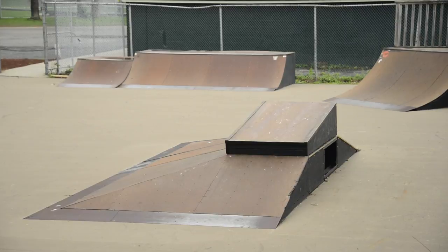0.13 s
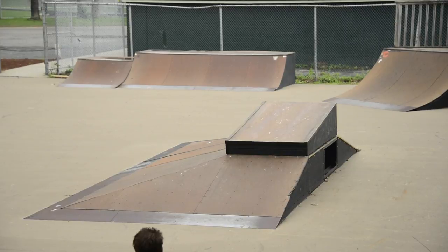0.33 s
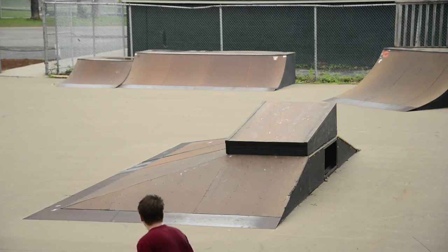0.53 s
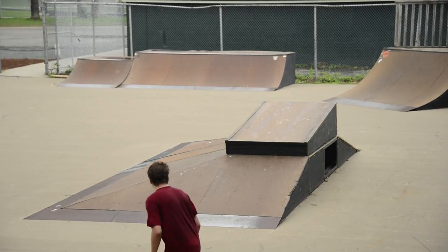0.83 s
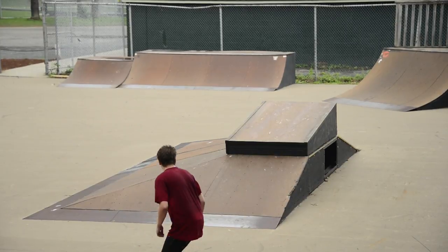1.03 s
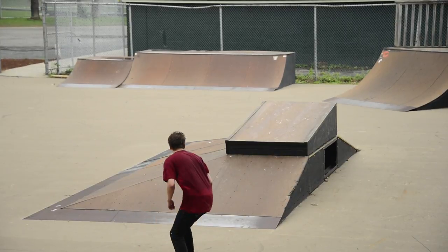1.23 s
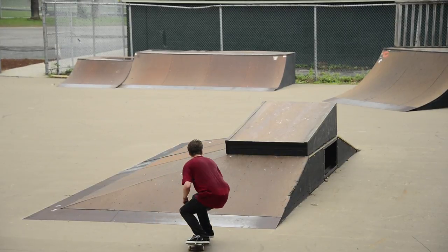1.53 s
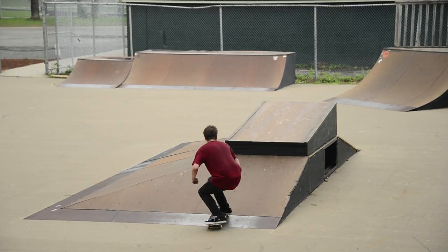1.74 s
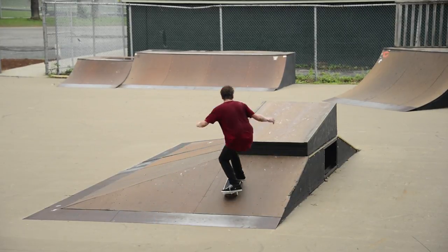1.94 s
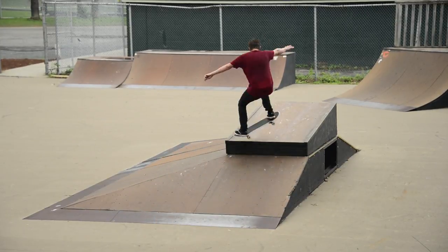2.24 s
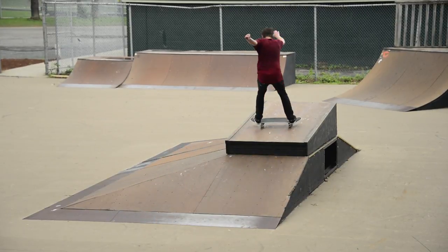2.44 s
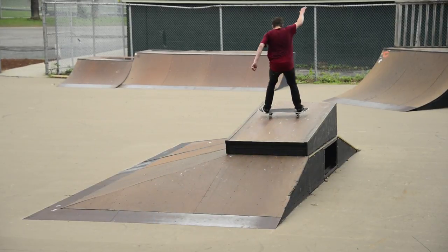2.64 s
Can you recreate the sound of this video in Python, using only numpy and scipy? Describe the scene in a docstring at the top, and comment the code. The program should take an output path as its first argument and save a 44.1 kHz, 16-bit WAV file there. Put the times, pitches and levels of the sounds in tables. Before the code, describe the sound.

A skateboard cuts in abruptly at 0.1 s, coarse and woody with stony knocks and a singing deck tone until 0.45, then duller, receding rolling with faint hiss. Bright hardware rattles tick at 1.0 and 1.2. Hard wood-and-steel clacks hit the hollow ramp at 1.83-1.96, a sharp pop at 2.2, near quiet, then a clipped, booming landing at 2.43, small knocks to 2.6 and fading outdoor echoes.

```python
"""A skateboard rolls away over asphalt, clatters across the steel lip of a wooden ramp, pops and lands on
a hollow box. Random grit excites the deck's resonances, beside a narrow-band drone and bearing hiss.
Noise bursts ring loose hardware, board and steel; impulses ring the ramp and box.
Decaying noise makes the echoes of ramps and fences; the microphone clips the hardest blows."""
import sys
import numpy as np
from scipy import signal
from scipy.fft import rfft, irfft, next_fast_len
from scipy.io import wavfile
from scipy.ndimage import map_coordinates

SR = 44100
rng = np.random.default_rng(int(sys.argv[2]) if len(sys.argv) > 2 else 0)


def master_out(mix):
    """Clip the mix to full scale and print it as 16-bit PCM to the path in sys.argv[1]."""
    frames = np.transpose(np.atleast_2d(mix))
    ceiling = np.clip(frames, -1, 1)
    pcm = np.round(ceiling * 32767).astype(np.int16)
    wavfile.write(sys.argv[1], SR, pcm)


N = 123479

# Ground rumble. Each row: frequency in Hz, relative spectral level in dB.
RUMBLE_SPECTRUM = [(15, -51), (25, -22), (54, -17.5), (226, -15.5), (257, -16), (330, -11), (430, -21),
                   (730, -120)]

# Echo decay of the yard. Each row: frequency in Hz, t60 in seconds.
YARD_DECAY = [(100, 1), (1000, 0.39), (3500, 0.73), (6500, 1), (10000, 0.3), (15000, 0.15)]
BLOW_ECHO_DB, RATTLE_ECHO_DB = -13.5, -28
ECHO_DULL_HZ = 8200  # echoes lose their treble above this

# Rattles of loose hardware. Each row: start in seconds, relative level in dB, rise time constant in seconds,
# t60 in seconds.
RATTLES = [(1.019, -13.5, 0.012, 0.3), (1.019, -9, .0004, 0.013), (1.027, -4.5, 0.00025, 0.0069),
           (1.031, 0.5, .001, 0.024), (1.038, -1.5, 0.00052, 0.015), (1.046, -0.5, 0.00026, 0.015),
           (1.055, -11, .0005, 0.012), (1.075, -7.5, 0.0006, 0.015), (1.084, -15, .004, 0.042),
           (1.165, -16, 0.011, 0.18), (1.168, -13, .0003, 0.0055), (1.178, 1.5, 0.00083, 0.0077),
           (1.191, -3.5, 0.00024, 0.0076), (1.227, -13, 0.0005, 0.016), (1.241, -14, .0006, 0.027),
           (1.849, -11, 0.0009, 0.038), (1.861, -11, .001, 0.022), (1.931, -3, 0.00065, 0.02),
           (1.915, -16, 0.017, 0.64), (1.975, -16, .004, .1), (2.459, -19.5, 0.0027, 0.12)]
# Hardware resonances. Each row: centre in Hz, width in Hz, relative level in dB.
HARDWARE_MODES = [(4500, 1740, -10.5), (5270, 675, 0), (6720, 1240, -9), (7870, 1800, -14.5)]
SNAP_DB = 2.5  # first click of a rattle over its chatter
RATTLE_TOP_HZ = 9100
SHARP_S = 0.0008  # a rise slower than this softens the first contact

# Blows. Each row: start in seconds, relative board level in dB, favoured pitch in Hz, favoured range in octaves,
# relative steel level in dB, relative hollow ramp or box level in dB, rise time constant in seconds,
# t60 in seconds.
BLOWS = [(1.026, -23, 2500, 2.1, -40, -18, 0.003, 0.13), (1.183, -20, 2480, 1.7, -53, -15.5, 0.0026, 0.045),
         (1.828, -6.5, 1200, 2.4, -8, -6, 0.0012, 0.091), (1.842, -23, 1000, 0.66, -12, -9, 0.00062, 0.032),
         (1.886, -5, 1170, 0.99, -18, -8, 0.00067, 0.022), (1.898, -2.5, 2040, 1, -1, -5.5, 0.00038, 0.049),
         (1.908, -29, 1790, 1.4, -12, -45, 0.0006, 0.13), (1.96, -4.5, 1560, 0.67, -40, -14, 0.0003, 0.017),
         (2.122, -13, 1860, 0.34, -28, -24.5, 0.0028, 0.08),
         (2.14, -36, 1720, 0.31, -45, -36, 0.0035, 0.03),
         (2.194, -7.5, 2830, 2.3, 0.5, -19, 0.0017, 0.0092),
         (2.199, -1.5, 2370, 1.2, -8, -28, 0.00097, 0.024),
         (2.213, -18.5, 1050, 0.68, -28, -26, 0.0016, 0.15),
         (2.3, -19.5, 1290, 1.05, -47, -25, 0.0016, 0.042),
         (2.376, -22, 2750, 1.6, -25.5, -25, 0.00035, 0.025),
         (2.4299, 3, 1350, 2.7, -9.5, -1, 0.00024, 0.02), (2.433, -1, 600, 0.76, -11.5, -13, 0.00022, 0.03),
         (2.445, -13, 885, 0.88, -21.5, -22, 0.00071, 0.044), (2.454, -30, 700, 0.84, -40, -12, .002, .03),
         (2.464, -21.5, 700, 1, -32, -10, 0.0018, 0.086), (2.576, -27, 1500, 0.98, -40, -14.5, .002, 0.054),
         (2.586, -17.5, 600, 0.72, -44, -19, 0.0016, 0.058)]
# Resonances of the struck bodies. Each row: centre in Hz, width in Hz, relative level in dB.
BOARD_MODES = [(550, 116, 1.5), (920, 290, 2), (1134, 170, 6.5), (1480, 330, -1.5), (1817, 165, 3),
               (2180, 340, 2), (3180, 1100, 2), (4070, 780, 2)]
STEEL_MODES = [(3870, 690, -2), (4870, 370, 3.5), (5830, 430, -3), (7130, 1800, -13)]
RAMP_MODES = [(95.6, 17, -4.5), (128, 54, 0.5), (159, 55, -3), (288, 63, -3.5), (404, 28, -3.5),
              (533, 47, 1)]
BOX_MODES = [(55, 10, -7), (90, 22, -5), (141, 17, -3.5), (210, 66, -7.5), (296, 20, -6), (448, 89, -5.5)]
STRIKE_DB = 14.5  # first contact over the clatter that follows
ON_BOX_S = 2.25  # later blows land on the box
# Needle-sharp cracks at hard contact. Each row: start in seconds, relative level in dB.
CRACKS = [(1.8289, -21), (1.833, -26), (1.898, -17), (2.2005, -13), (2.4301, -5)]
CRACK_T60_S, CRACK_LOW_HZ = 0.0025, 5850

# Rolling. Each row: time in seconds, relative level of the deck's excitation in dB, then the levels of the
# low drone, the bearing hiss and the ground rumble in dB.
ROLL_LEVELS = [(.1, -13.5, -28, -31.5, -30), (.2, -10.5, -29.5, -34, -35.5), (.4, -11.5, -26.5, -34, -40.5),
               (.5, -22, -28, -35.5, -36), (.7, -22, -26.5, -34.5, -40), (.82, -19.5, -24.5, -34.5, -38),
               (.95, -21, -36.5, -35.5, -37), (1.0, -20, -27, -36, -39.5), (1.2, -18.5, -29.5, -34, -34.5),
               (1.38, -17, -33.5, -33.5, -41), (1.43, -20, -31, -35.5, -40), (1.5, -20, -26.5, -36.5, -45),
               (1.6, -19.5, -36, -36.5, -37.5), (1.8, -21, -32.5, -38, -43), (1.93, -26.5, -27.5, -28, -42),
               (2.0, -28, -42, -36.5, -29), (2.15, -29.5, -41, -37.5, -36), (2.3, -34.5, -61, -40, -44),
               (2.41, -42, -50, -44.5, -54), (2.5, -30.5, -31, -34, -36), (2.62, -34, -61, -43.5, -38.5),
               (2.8, -39, -42, -44.5, -51.5)]
# Larger stones under a wheel. Each row: time in seconds, relative peak in dB.
STONES = [(0.1, 0), (0.169, 5), (0.206, -4), (0.24, -10), (0.251, -3), (0.374, -1.5), (0.404, 2),
          (0.424, -6)]
STONE_GAIN_DB = 14.5
GRAINS_PER_S, GRAIN_SPREAD_DB = 700, 3
SMOOTH_SHARE = 0.95  # share of the grit's power that is a smooth rub
# Pitch of the drone. Each row: time in seconds, frequency in Hz.
DRONE_PITCH = [(.1, 495), (.44, 500), (.48, 410), (.8, 385), (1.2, 385), (1.45, 348), (1.9, 350),
               (2.8, 270)]
DRONE_CORNER_HZ = 95  # corner of each pole limiting the drone's spread to either side
# Bearing hiss. Each row: frequency in Hz, relative spectral level in dB.
HISS_SPECTRUM = [(1350, -62), (2300, -6), (3020, -0.5), (3630, -1), (4160, 6), (5430, 3), (6960, -3),
                 (8780, -13), (15600, -35.5)]
# One deck mode sings out. Each row: time in seconds, level in dB.
SING_LEVEL = [(.08, -40), (.124, -20), (.146, -36), (.17, -24), (.214, -16), (.26, -38), (.33, -25),
              (.385, -16), (.42, -27.5), (.46, -26), (.6, -37), (1.0, -33.5), (1.8, -43.5), (1.84, -56)]
# The singing mode. Each row: centre in Hz, width in Hz, relative level in dB.
SING_MODE = [(1625, 110, 0)]
# Deck resonances as the board draws away, then on wood. Each row: centre in Hz, width in Hz, relative level in dB.
NEAR_MODES = [(647, 360, -11), (892, 86, -0.5), (1065, 225, -5), (1320, 194, -2), (1434, 150, -1),
              (1783, 116, -0.5), (2114, 68, -4.5), (2540, 170, -13.5)]
MIDWAY_MODES = [(623, 190, -1), (820, 48, 2.5), (1063, 220, 3.5), (1340, 87, 4.5), (1430, 110, 6),
                (1698, 100, 9), (1874, 140, 4), (2370, 1300, -9)]
FARTHER_MODES = [(625, 45, 2), (906, 57, 2), (1003, 97, 0), (1267, 64, 5.5), (1616, 143, 5),
                 (1980, 400, -1)]
FAR_MODES = [(609, 41, 4.2), (850, 61, 3.8), (1380, 280, 3.4), (1565, 190, 4.5), (1696, 155, 5.2)]
ON_WOOD_MODES = [(555, 310, 1.5), (1190, 540, 2), (1581, 380, 4.5), (2270, 2400, -1.5), (3230, 9000, -11)]
# Which set is heard. Each row: time in seconds, set number from 0 (near) to 4 (on wood).
STAGE = [(.42, 0), (.55, 1), (.92, 1), (1.05, 2), (1.38, 2), (1.42, 3), (1.82, 3), (1.85, 4)]
# The soft wheels pass little above this. Each entry: low-pass corner in Hz for one set, in the same order.
SOFT_WHEEL_HZ = [2570, 2650, 2600, 2120, 5650]
WAVER_DB, WAVER_PER_S = 0.88, 30  # each deck resonance swells on its own

START_S, FADE_IN_S = .08, 0.0017  # the sound cuts in
CLIP, KNEE = 1.0, 5.3  # saturation ceiling and sharpness of its bend
MIC_HISS_DB = -62
BASS_CUT_HZ, TOP_HZ = 31, 15800


def amp(db):
    """The decibel law: level in dB to amplitude gain."""
    return 10 ** (np.asarray(db) / 20)


def unit(x):
    """Power normalisation: x scaled to rms 1."""
    return x / np.sqrt(np.mean(x ** 2) + 1e-20)


def along(points, hz):
    """Interpolation of (Hz, value) points on a logarithmic frequency axis."""
    f, v = np.transpose(points)
    return np.interp(np.log(hz + 1), np.log(f + 1), v)


def curves(rows):
    """Linear interpolation in time: one value per sample for each column after the time."""
    s, *cols = np.transpose(rows)
    return [np.interp(np.arange(N) / SR, s, c) for c in cols]


def wobble(rate):
    """Slow random modulation: a smooth curve through rate random knots a second."""
    knots = rng.standard_normal(int(N * rate / SR) + 4)
    return map_coordinates(knots, [np.arange(N) * rate / SR])


def filtered(x, response):
    """Linear filtering: the spectrum of x times a complex response of frequency."""
    m = next_fast_len(N + SR // 2)
    return irfft(rfft(x, m) * response(np.fft.rfftfreq(m, 1 / SR)), m)[..., :N]


def low(x, corner_hz):
    """Two cascaded first-order low-pass sections."""
    return filtered(x, lambda f: 1 / (1 + 1j * f / corner_hz) ** 2)


def through(x, modes):
    """Modal resonance: x rung through parallel second-order modes of alternating sign."""
    def response(f):
        return sum((-1) ** k * amp(db) * 1j * f * w / (c * c - f * f + 1j * f * w)
                   for k, (c, w, db) in enumerate(modes))
    return filtered(x, response)


def coloured(x, spectrum):
    """Spectral shaping: x weighted by (Hz, dB) points and scaled to rms 1."""
    return unit(filtered(x, lambda hz: amp(along(spectrum, hz))))


def bursts(rows):
    """Exponential decay: noise rises and dies within at most 0.25 s, for rows of (s, dB, rise s, t60 s)."""
    out, t = np.zeros(N + SR), np.arange(SR // 4) / SR
    for s, db, rise, t60 in rows:
        onset = 1 - np.exp(-t / max(rise, 1e-4))
        decay = amp(db - 60 * t / max(t60, 1e-3))
        out[round(s * SR):][:len(t)] += onset * decay * rng.standard_normal(len(t))
    return out[:N]


def ground_rumble():
    """Broadband excitation: low noise of the ground whose level follows the rolling and wavers."""
    level_db = curves(ROLL_LEVELS)[3] + 0.39 * wobble(4.26)
    return amp(level_db) * coloured(rng.standard_normal(N), RUMBLE_SPECTRUM)


def yard(x):
    """Diffuse reverberation: scattered echoes in which each frequency dies at its own speed."""
    hz, t, z = signal.stft(rng.standard_normal(SR), SR, nperseg=256)
    decay = amp(-60 * t / along(YARD_DECAY, hz)[:, None])
    tail = signal.istft(z * decay, SR, nperseg=256)[1]
    dull = filtered(x, lambda f: 1 / (1 + 1j * f / ECHO_DULL_HZ) ** 3)
    delayed = np.pad(dull, (600, 0))  # samples before the first echo
    return signal.fftconvolve(delayed, tail / np.linalg.norm(tail))[:N]


def rattles():
    """Forced resonance: chatter of nuts and washers, each begun by a click, rings the hardware."""
    chatter = bursts(RATTLES)
    for s, db, rise, _ in RATTLES:
        chatter[round(s * SR)] += amp(db + SNAP_DB) * min(1, SHARP_S / rise)
    ring = through(through(chatter, HARDWARE_MODES), [(5600, 6500, 0)])
    return amp(8.5) * filtered(ring, lambda f: 1 / np.sqrt(1 + (f / RATTLE_TOP_HZ) ** 8))


def struck_board():
    """Modal excitation by position: the spot struck favours the board modes near one pitch."""
    board = 0
    for s, db, hz, octaves, _, _, rise, t60 in BLOWS:
        modes = [(c, w, g - 6 * (np.log2(c / hz) / octaves) ** 2) for c, w, g in BOARD_MODES]
        clatter = bursts([(s, db, rise, t60)])
        clatter[round(s * SR)] = amp(db + STRIKE_DB) * min(1, SHARP_S / rise)
        board = board + through(clatter, modes)
    return amp(13.0) * low(board, corner_hz=3700)


def struck_steel():
    """Modal ringing of steel: bursts of noise drive its high resonances."""
    clatter = bursts([(s, db, rise, t60) for s, _, _, _, db, _, rise, t60 in BLOWS])
    return amp(13.5) * low(through(clatter, STEEL_MODES), corner_hz=7760)


def hollow_bodies():
    """Impulse response: a single knock rings the hollow ramp, or later the box."""
    knocks = np.zeros(N)
    for s, _, _, _, _, db, _, _ in BLOWS:
        knocks[round(s * SR)] = amp(db)
    on_box = np.arange(N) > ON_BOX_S * SR
    hollow = through(knocks * on_box, BOX_MODES) + through(knocks * ~on_box, RAMP_MODES)
    return amp(41.5) * low(hollow, corner_hz=525)


def cracks():
    """Short contact, broad spectrum: brief noise stripped of its lows at hard contact."""
    crack = bursts([(s, db, .0001, CRACK_T60_S) for s, db in CRACKS])
    high = crack - low(crack, corner_hz=CRACK_LOW_HZ)
    return amp(8.0) * low(high, corner_hz=9000)


def blows():
    """Superposition: each blow excites board, steel and hollow body in its own measure, some with a crack."""
    return struck_board() + struck_steel() + hollow_bodies() + cracks()


def grit():
    """Random impulsive excitation: grains of the asphalt over a smooth rub."""
    hit = rng.random(N) < GRAINS_PER_S / SR
    grains = hit * rng.standard_normal(N) * amp(GRAIN_SPREAD_DB * rng.standard_normal(N))
    rub = rng.standard_normal(N)
    return np.sqrt(1 - SMOOTH_SHARE) * unit(grains) + np.sqrt(SMOOTH_SHARE) * rub


def deck(shake):
    """Modal resonance of the deck: wavering sets of modes, cross-faded as the board draws away."""
    stage, out = curves(STAGE)[0], 0
    sets = [NEAR_MODES, MIDWAY_MODES, FARTHER_MODES, FAR_MODES, ON_WOOD_MODES]
    for k, modes in enumerate(sets):
        rung = sum((-1) ** i * amp(WAVER_DB * wobble(WAVER_PER_S)) * through(shake, [mode])
                   for i, mode in enumerate(modes))
        soft = filtered(rung, lambda hz: 1 / (1 + 1j * hz / SOFT_WHEEL_HZ[k]) ** 3)
        share = np.sqrt(np.clip(1 - abs(stage - k), 0, 1))
        out = out + amp(11.0) * soft * share
    return out


def shaken_deck():
    """Forced vibration: grit and larger stones under the wheels shake the deck."""
    shake = grit() * amp(curves(ROLL_LEVELS)[0] + 0.74 * wobble(29.95))
    for s, db in STONES:
        shake[round(s * SR)] += amp(db + STONE_GAIN_DB)
    return deck(shake)


def singing_mode():
    """Selective resonance: one deck mode, passed twice, sings out most while the board is near."""
    ring = through(through(grit(), SING_MODE), SING_MODE)
    return amp(curves(SING_LEVEL)[0]) * unit(ring)


def wheel_drone():
    """Quadrature modulation: slow grit noise on a low carrier whose pitch sinks with distance."""
    slow = filtered([grit(), grit()], lambda hz: 1 / (1 + 1j * hz / DRONE_CORNER_HZ) ** 4)
    phase = 2 * np.pi * np.cumsum(curves(DRONE_PITCH)[0]) / SR
    drone = unit(slow[0] * np.cos(phase) + slow[1] * np.sin(phase))
    return amp(curves(ROLL_LEVELS)[1]) * drone


def bearing_hiss():
    """Friction noise: steady noise and grit shaped into a wavering hiss."""
    hiss = coloured(rng.standard_normal(N) + 0.47 * grit(), HISS_SPECTRUM)
    return amp(curves(ROLL_LEVELS)[2] + 1.22 * wobble(26.37)) * hiss


def rolling():
    """Superposition: shaken deck, singing mode, drone and bearings form the rolling sound."""
    return shaken_deck() + singing_mode() + wheel_drone() + bearing_hiss()


def scene():
    """Superposition of ground rumble, echoes, rattles, blows and rolling."""
    chatter, hits = rattles(), blows()
    echoes = amp(BLOW_ECHO_DB) * yard(hits) + amp(RATTLE_ECHO_DB) * yard(chatter)
    return (ground_rumble() + echoes + chatter + hits + rolling())[None]


def record(dry):
    """Saturation and band limiting: the microphone clips, hisses faintly and starts abruptly."""
    clipped = dry / (1 + abs(dry / CLIP) ** KNEE) ** (1 / KNEE)
    hissing = clipped + amp(MIC_HISS_DB) * rng.standard_normal(N)
    opened = hissing * np.clip((np.arange(N) / SR - START_S) / FADE_IN_S, 0, 1)
    return filtered(opened, lambda hz: (hz < TOP_HZ) * 1j * hz / (BASS_CUT_HZ + 1j * hz))


dry = scene()
out = record(dry)
master_out(out)
```